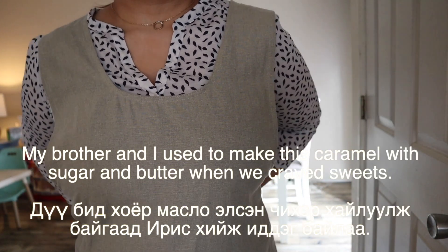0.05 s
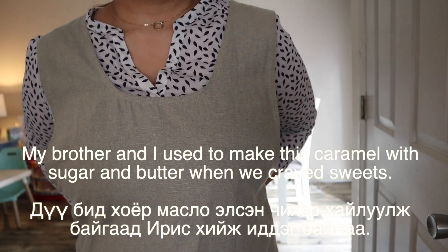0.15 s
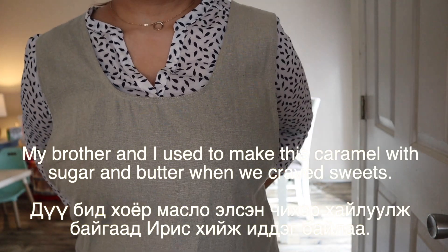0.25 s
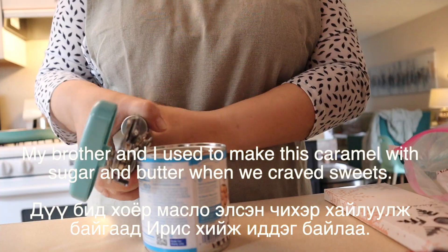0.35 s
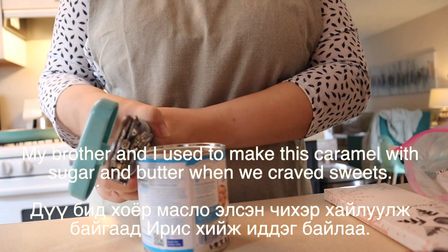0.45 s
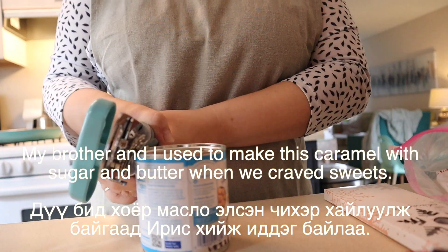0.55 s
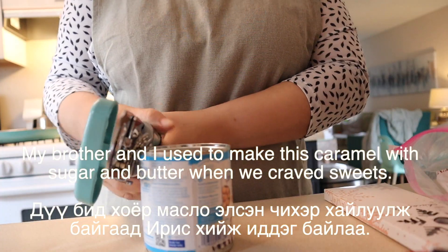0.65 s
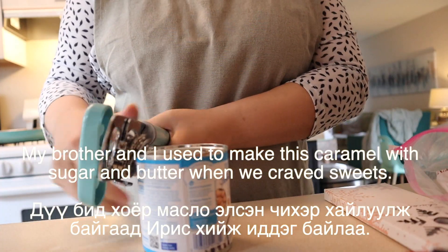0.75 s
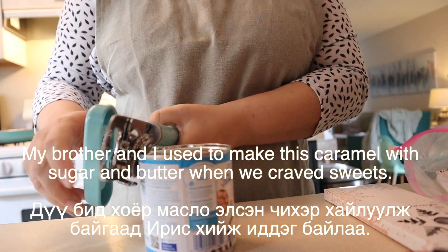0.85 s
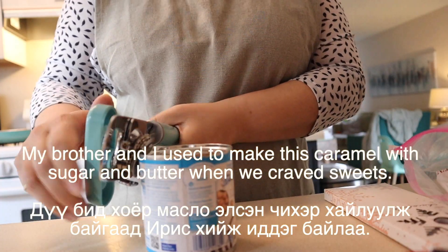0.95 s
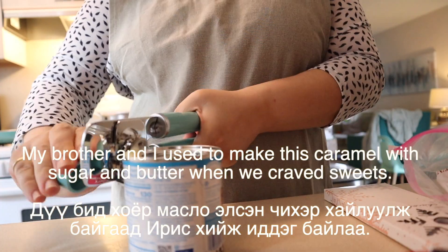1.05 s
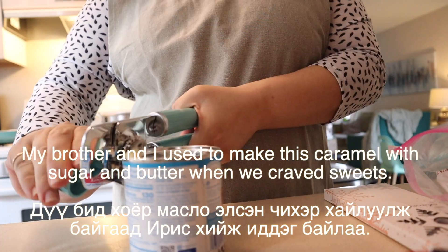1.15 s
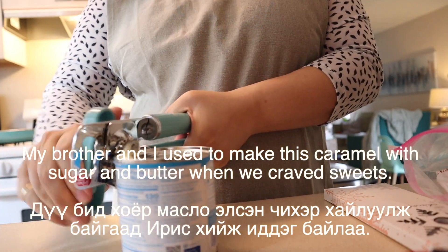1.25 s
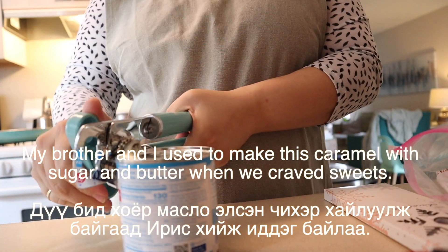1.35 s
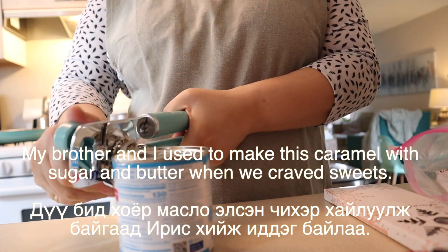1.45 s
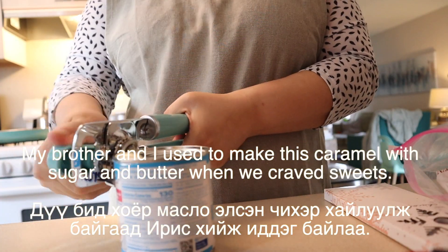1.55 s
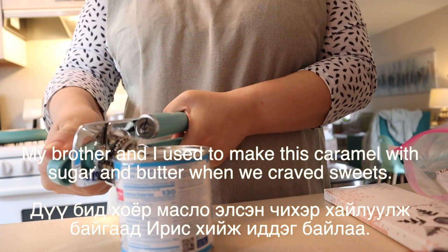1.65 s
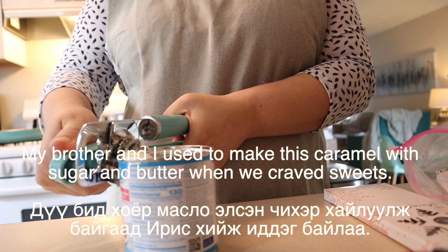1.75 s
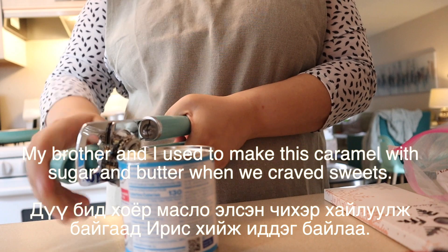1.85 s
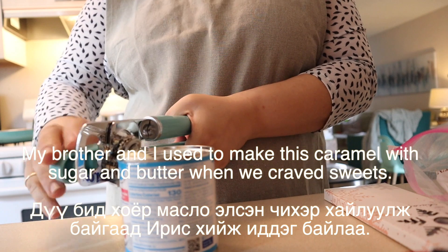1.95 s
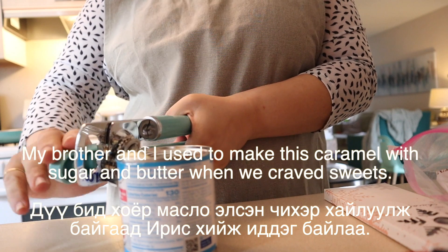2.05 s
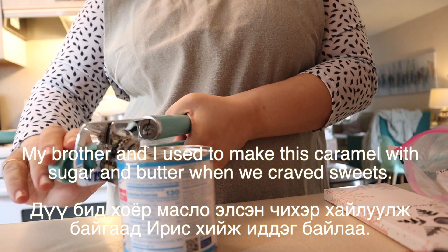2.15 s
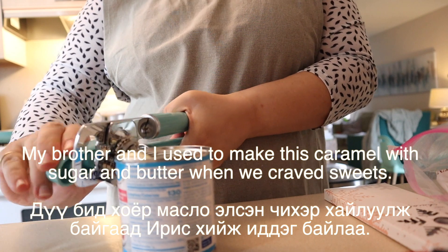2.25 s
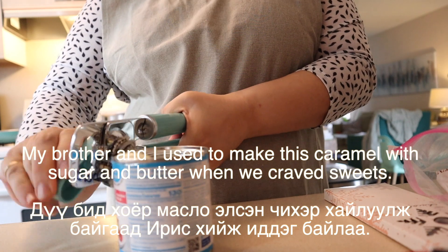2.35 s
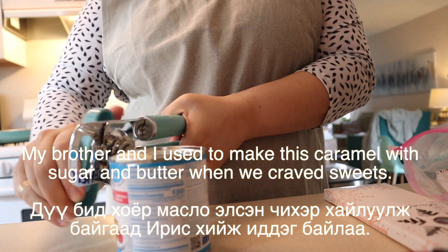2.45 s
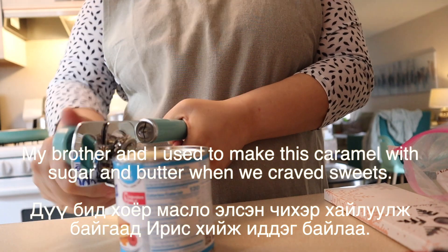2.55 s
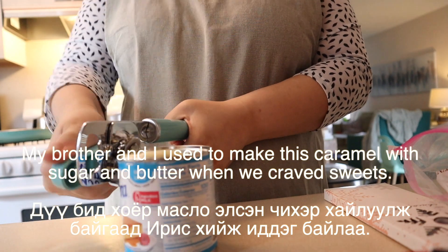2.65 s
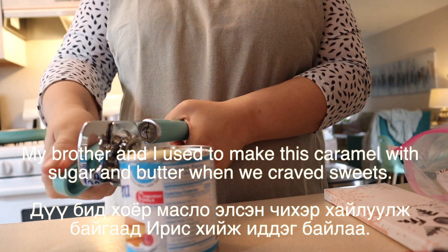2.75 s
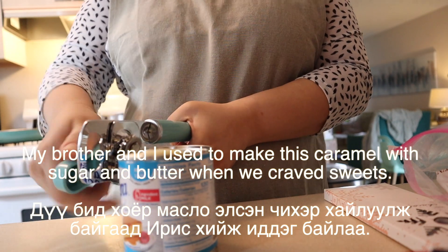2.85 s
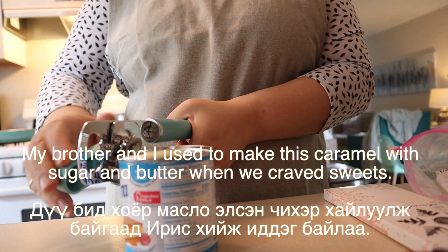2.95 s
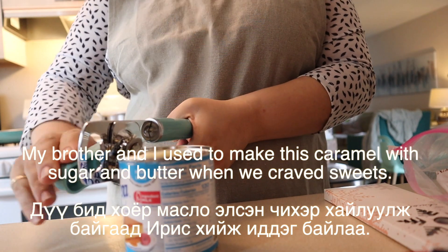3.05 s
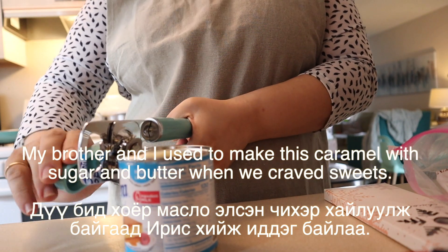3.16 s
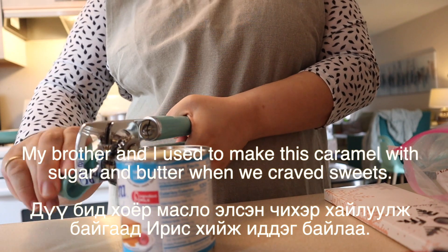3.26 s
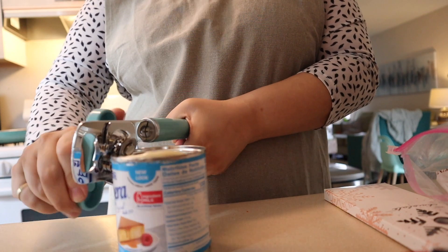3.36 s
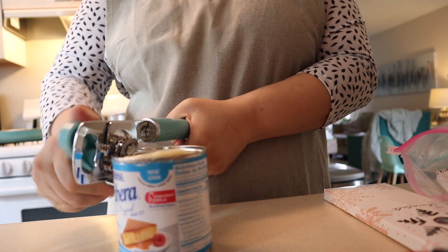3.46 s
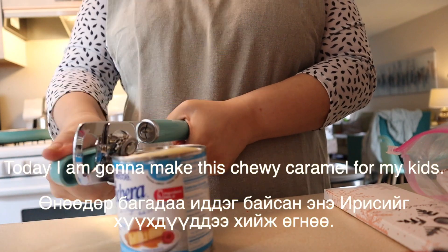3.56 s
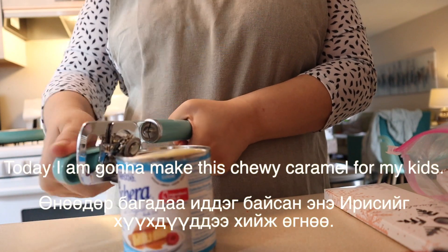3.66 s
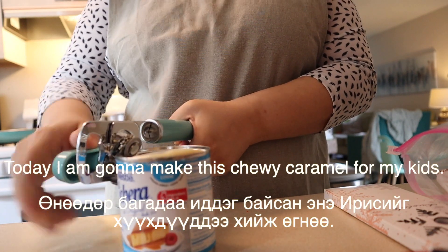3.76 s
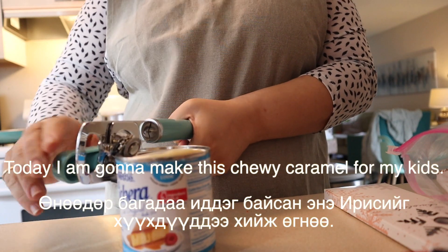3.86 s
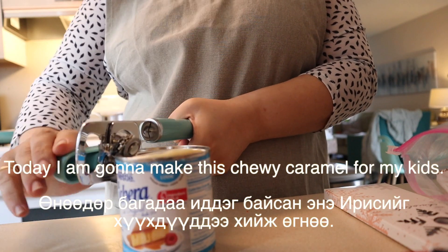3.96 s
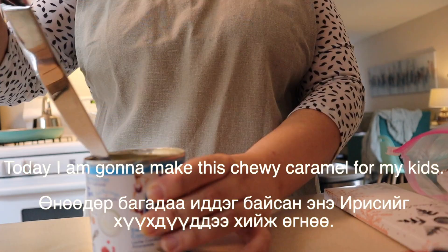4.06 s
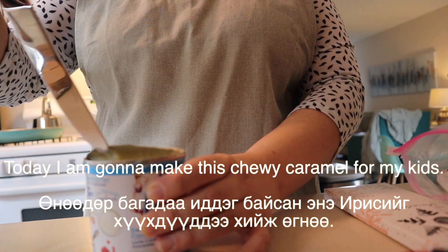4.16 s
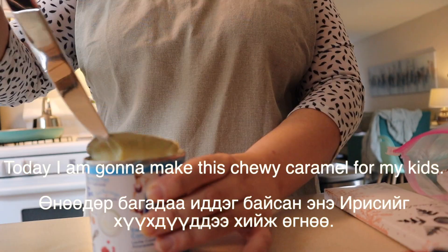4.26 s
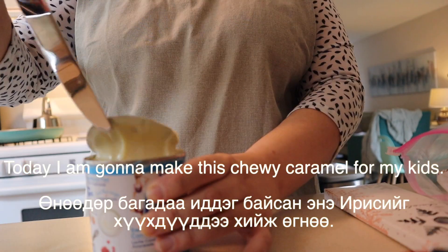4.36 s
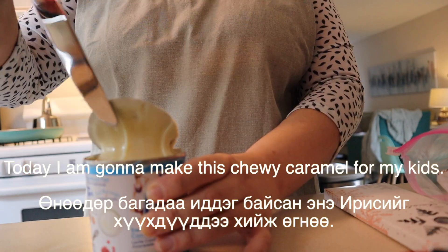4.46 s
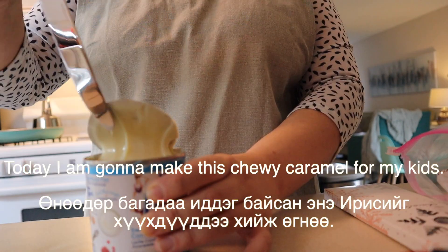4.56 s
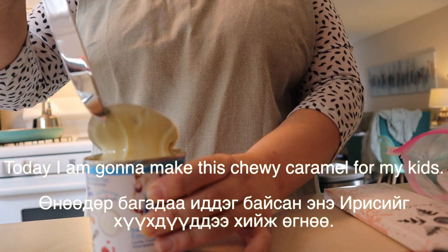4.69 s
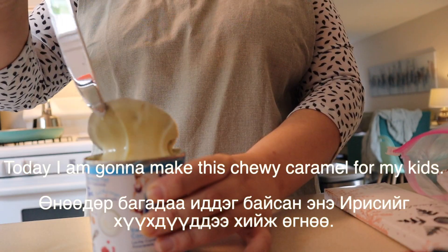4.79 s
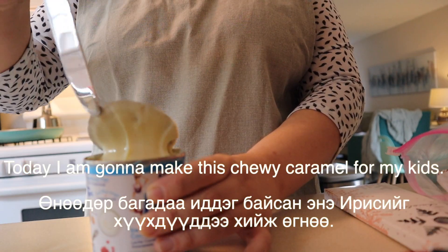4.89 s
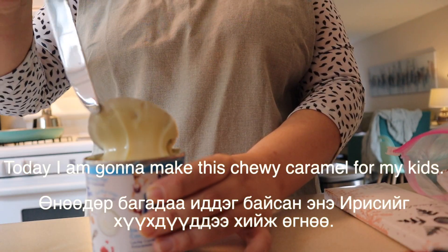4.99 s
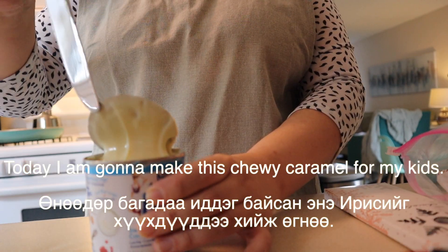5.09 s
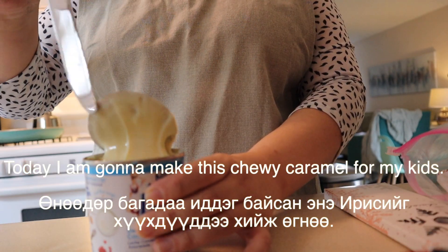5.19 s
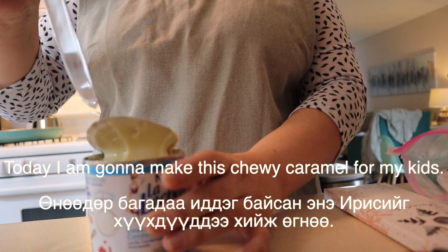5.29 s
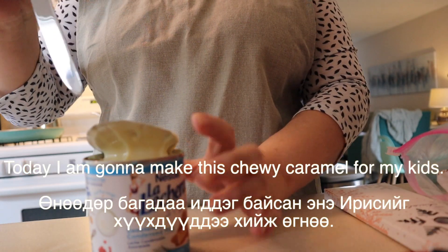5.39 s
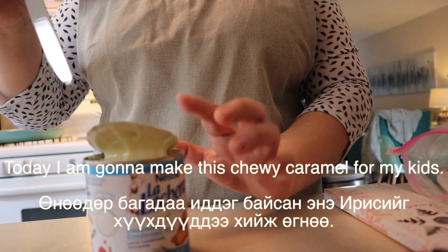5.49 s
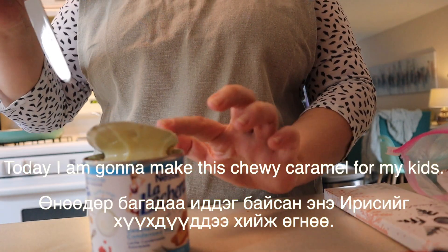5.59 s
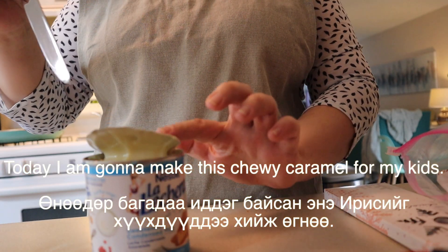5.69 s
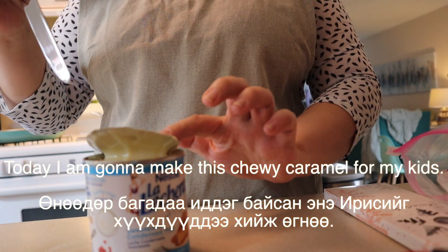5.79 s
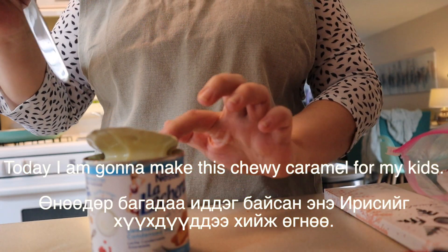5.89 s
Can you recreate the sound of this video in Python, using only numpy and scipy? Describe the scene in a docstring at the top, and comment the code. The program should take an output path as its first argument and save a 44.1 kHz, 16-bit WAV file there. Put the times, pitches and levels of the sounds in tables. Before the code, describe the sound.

Close metallic knocks, a puncturing crack and three grating can-opener turns over a faint fridge hum, ending with a knife ring and lid pop.

```python
"""Over a fridge hum and quiet room noise, hands rustle and a can opener knocks a tin on a wooden table.
It punctures the lid, then tears round the rim in three rasping turns, with snaps, clicks and more knocks.
A knife taps the rim, grates under the lid, skids off and rings; the lid flexes with a pop and grazes the blade.
Blows are decaying modes and filtered noise bursts; friction is random slips ringing metal; the treble is wide."""
import sys
import numpy as np
from scipy import signal
from scipy.fft import rfft, irfft, next_fast_len
from scipy.io import wavfile
from scipy.ndimage import uniform_filter1d, map_coordinates

SR = 44100
rng = np.random.default_rng(int(sys.argv[2]) if len(sys.argv) > 2 else 0)


def generate_wav(signal):
    """Clip the signal to [-1, 1] and save it as 16-bit WAV at the path in sys.argv[1]."""
    frames = np.transpose(np.atleast_2d(signal))
    scaled = np.clip(frames, -1, 1) * 32767
    pcm = np.round(scaled).astype(np.int16)
    wavfile.write(sys.argv[1], SR, pcm)


N = 261513
TIME = np.arange(N) / SR  # seconds

# Force strokes of the crank. The first turn stalls partway and takes two twists; the second starts firmly
# and swells again without stopping, in two overlapping rows; the third is one row. Each row: start in seconds,
# build-up in seconds, easing in seconds, rasp gain in dB, hiss gain above it in dB, table rumble gain in dB.
CRANK_STROKES = [(1.255, 0.034, 0.13, -31.5, -6, -38), (1.469, 0.044, 0.2, -36, -7, -30.5),
                 (2.36, 0.061, 0.068, -35, -4, -36), (2.501, 0.023, 0.23, -31, -4, -27.5),
                 (3.354, 0.19, 0.039, -31, -3, -28.5)]
# A drive-wheel tooth catches on the rim and the blade lurches on. Each row: start in seconds,
# extra force in dB before the swell, which lets about 0.6 of it through.
TOOTH_CATCHES = [(1.315, -1), (1.470, 2), (1.494, 4), (1.600, 3.5), (1.655, 4), (2.330, 6), (2.405, 1.5),
                 (2.450, 5.5), (2.503, 1.5), (2.682, 2), (3.322, 5.5), (3.352, 4), (3.378, 0), (3.449, 2.5),
                 (3.476, 0), (3.526, 7.5), (3.561, 8)]
# Resonance of the tearing lid. Each row: frequency in Hz, level in dB.
RASP_SPECTRUM = [(120, -35), (200, -10), (290, -1.5), (345, -16), (431, -0.5), (510, -7), (620, -2),
                 (786, 10), (930, -1), (1140, -4), (1700, -8.5), (2020, -13.5), (2450, -14), (3570, -20.5),
                 (5000, -42), (11000, -100)]
# Bright resonance of the tearing edge. Each row: frequency in Hz, level in dB.
HISS_SPECTRUM = [(2000, -13), (3000, -2.5), (3590, -2), (4000, 2), (4510, -3.5), (5500, 2.5), (6600, -7.5),
                 (7500, -5), (8700, -14.5), (11200, -4.5), (13000, -29.5), (16000, -71)]
# Ring of the cutting wheel and its axle. Each row: frequency in Hz, level in dB, t60 in seconds.
WHEEL_MODES = [(3576, -2.5, 0.028), (4430, -2.5, 0.022), (4850, -10, 0.057), (5260, -13, 0.05),
               (7070, -4.5, 0.0147)]
# Ring of the tin. Each row: frequency in Hz, level in dB, t60 in seconds.
TIN_MODES = [(438.3, -0.5, 0.15), (494.7, 0, 0.083), (614, -6, 0.061), (700, -0.5, 0.046),
             (787, 7.5, 0.069), (930, -5, 0.034), (1071, 0, 0.12), (1157, 0.5, 0.1), (1238.6, -4, 0.11),
             (1418, -6.5, 0.061), (1507, -6.5, 0.07), (1676, -6, 0.12), (2036, -2.5, 0.062),
             (2362, -27, 0.051)]
# The lid's steel gives way ahead of the wheel. Each row: start in seconds, approximate crack peak in dB.
STEEL_SNAPS = [(1.314, -30), (1.548, -27.5), (1.696, -30.5), (1.705, -24.5), (2.503, -23), (2.531, -28.5),
               (2.598, -26), (2.612, -25.5), (2.756, -31), (3.3493, -21), (3.37, -34), (3.475, -25),
               (3.534, -32), (3.547, -34), (3.559, -24)]
# Pop of the dented lid. Each row: frequency in Hz, level in dB, t60 in seconds.
PUNCTURE_MODES = [(126, -5, 0.16), (435, -8, 0.19), (542, -8, 0.15), (627, -0.5, 0.12), (792, 3, 0.086),
                  (952, 1.5, 0.02), (1035, -0.5, 0.046), (1490, 0.5, 0.017), (1670, -3.5, 0.055)]
# Noise ring of steel cracking through. Each row: frequency in Hz, level in dB.
CRACK_SPECTRUM = [(300, -5.5), (800, 5), (1800, 6), (3000, -1.5), (4200, -0.5), (6500, -7), (10000, -4),
                  (13000, -16.5), (16000, -17)]
# Opener and tin knock on the table. Each row: start in seconds, overall gain in dB,
# table thump against it in dB before a 6.5 dB trim, steel tick against it in dB.
TABLE_KNOCKS = [(.324, -22.5, -8.5, -36), (.372, -27, -6, -36), (.396, -19.5, -22.5, -43),
                (.455, -25.5, -9, -42.5), (.610, -15.5, -8.5, -28.5), (.759, -14.5, -10, -22.5),
                (.762, -2, -7, -23), (1.2014, -2.5, 0, -27), (1.2861, -16, -6.5, -31), (1.314, -11, 1, -24),
                (1.463, -26, -8, -34), (1.472, -20, -4, -34), (1.698, -21.5, 4, -20),
                (1.8445, -8.5, -1.5, -28), (1.8505, -17.5, 0, -6.5), (2.17, -26.5, 7.5, -22),
                (2.599, -16.5, -2.5, -25), (2.730, -17.5, -10, -24.5), (2.998, -5.5, -2, -24),
                (3.3511, -19, 2, -22), (3.3701, -14, -3.5, -24), (3.4754, -16.5, 4.5, -31),
                (3.545, -19, 2, -25), (3.675, -25.5, -2, -52.5), (3.682, -5.5, -4.5, -24)]
# Noise ring of a knock. Each row: frequency in Hz, level in dB.
KNOCK_SPECTRUM = [(100, 0.5), (200, -9.5), (330, -4), (450, -0.5), (700, -2.5), (1150, -2), (2150, -12.5),
                  (2850, -22.5), (4500, -32), (7000, -42.5), (12000, -79.5), (16000, -71.5)]
# Ring of the wooden table top. Each row: frequency in Hz, level in dB, t60 in seconds.
TABLE_MODES = [(65.8, -21.5, 0.18), (91.8, -1.5, 0.17), (120.7, -1.5, 0.17)]
# Small sharp clicks of steel on steel. Each row: start in seconds, approximate peak in dB.
STEEL_CLICKS = [(.323, -36.5), (.892, -41), (2.02, -34.5), (2.828, -42), (2.88, -24.5), (4.116, -44),
                (4.400, -33.5), (4.435, -30), (4.954, -34.5), (5.139, -41)]
# Noise ring of a click. Each row: frequency in Hz, level in dB.
CLICK_SPECTRUM = [(300, 2.5), (800, 7), (2000, 0.5), (4000, -4), (7000, -10), (12000, -10.5),
                  (13500, -34.5), (16000, -40.5)]
# The wheel scrapes as it sinks into the lid. Each row: start in seconds, length in seconds,
# level in dB before the edges are faded, brightness in dB per octave.
WHEEL_SCRAPES = [(0.554, 0.062, -38.5, 0.5), (.604, .06, -33, -2.5)]
# Colour of those scrapes. Each row: frequency in Hz, level in dB.
SCRAPE_SPECTRUM = [(200, -7), (450, -5.5), (900, 1.5), (2000, -2), (3000, -13.5), (6000, -12.5),
                   (11000, -15.5), (13500, -33)]
# Knife tip on the rim. Each row: frequency in Hz, level in dB.
TAP_SPECTRUM = [(600, -9), (1800, 4), (2900, 5.5), (3900, 6.5), (5000, -7), (9000, -22), (12000, -16),
                (15000, -43)]
# The knife grates under the cut edge of the lid. Each row: start in seconds, length in seconds,
# level in dB before the edges are faded, brightness in dB per octave.
KNIFE_SCRAPES = [(4.306, 0.049, -42, -2.5), (4.380, 0.044, -41, -1.5), (4.428, 0.041, -36, 0.5),
                 (4.464, .05, -33.5, -1.5), (5.26, 0.039, -47, 2)]
# Colour of the pried lid. Each row: frequency in Hz, level in dB.
PRIED_SPECTRUM = [(200, 6.5), (460, 2.5), (620, -6), (880, 7.5), (1080, -5.5), (1350, 3), (1520, -7),
                  (1700, 6.5), (2020, 0.5), (2700, -13.5), (3900, -14), (5000, -17.5), (11000, -20),
                  (13500, -35)]
# Ring of the knife. Each row: frequency in Hz, level in dB, t60 in seconds.
KNIFE_MODES = [(2865, 7.5, 0.051), (3000, -6, 0.07), (3656, -10, .08), (4095, 1.5, 0.092),
               (4910, -11, 0.081), (5650, 5, 0.036), (6840, 0, 0.18), (8160, -0.5, 0.08), (8900, -7.5, .15),
               (9851, -9, 0.18), (10700, -5, 0.13), (11700, 2.5, 0.11)]
# Pop of the flexing lid. Each row: frequency in Hz, level in dB, t60 in seconds.
LID_MODES = [(815.7, 4.5, 0.058), (882, -3, 0.052), (1095, -4.5, 0.045), (1530, -13, 0.082),
             (1730, -0.5, 0.031), (1954, -6, 0.033), (2370, -12, 0.06)]
# Lid edge against the blade. Each row: frequency in Hz, level in dB.
GRAZE_SPECTRUM = [(800, -2), (2500, -4), (5000, -0.5), (7500, -7), (9200, 2.5), (11500, 1), (12800, -31),
                  (15000, -45.5)]
# Hands, sleeve and apron brush past. Each row: start in seconds, length in seconds,
# level in dB before the edges are faded, brightness in dB per octave.
CLOTH_RUSTLES = [(0, 0.44, -51.5, 0), (.37, 0.44, -44.5, -3), (1.07, 0.11, -61.5, 1.5),
                 (1.76, 0.106, -45, -4), (1.87, 0.106, -63, 4.5), (3.69, 0.15, -54, -1.5)]
# Colour of the cloth. Each row: frequency in Hz, level in dB.
CLOTH_SPECTRUM = [(150, -5.5), (450, 10.5), (1000, 4.5), (2500, -2.5), (6000, -12.5), (11500, -11.5),
                  (13500, -36.5)]
# Reflections from cupboards and far walls. Each row: delay in seconds, level in dB.
ROOM_ECHOES = [(.019, -15.5), (.039, -20), (.0565, -34.5)]
# Colour of a reflection. Each row: frequency in Hz, level in dB.
ECHO_SPECTRUM = [(100, -21), (450, 1), (1200, -1.5), (2500, -5), (6000, -17), (14000, -22)]
# Background fades. Each row: time in seconds, room noise level in dB, hum gain in dB.
BACKGROUND_LEVELS = [(0, -40, -24), (.3, -47.5, -6), (0.422, -41.5, 0.5), (3.7, -39, 2), (5.93, -40.5, 1)]
# Colour of the room noise. Each row: frequency in Hz, level in dB.
KITCHEN_SPECTRUM = [(20, -43.5), (33, -8), (48, -4.5), (65, 1), (85, -18.5), (120, -2), (155, -17.5),
                    (210, -10), (330, -16), (650, -26), (1500, -34), (4000, -45), (11000, -61.5),
                    (14700, -64.5)]
# Fridge hum lines. Each row: frequency in Hz, level in dB before the hum gain.
FRIDGE_HUM = [(59.8, -49), (120.2, -41), (195, -53)]
# Stereo width. Each row: frequency in Hz, gain of the side channel in dB.
SIDE_GAIN = [(60, -72), (120, -27.5), (250, -10), (500, -6), (1000, 0), (2000, 1.5), (4000, 4), (9000, 8),
             (14000, 13)]

GRIP_DB, LET_GO_DB = -3.5, -4.5  # force at the start and end of a stroke, against its peak
GRIP_DB_PER_S, LET_GO_DB_PER_S = 175, 279.5  # how fast the wheel takes hold and stops
HISS_GROWTH, RUMBLE_GROWTH = 1.83, 0.77  # dB of hiss and of rumble per dB of force
CLAMPED_S = (1.04, 3.6)  # the opener grips the rim
IDLE_RASP_DB, IDLE_RUMBLE_DB = -55.5, -41.5  # gains while the hands work it between strokes
TOOTH_DB, CRUNCH_DB = 1.2, 2.2  # unevenness of the bite; coarse crunches against the fine tearing
RASP_GLIDE, HISS_GLIDE = .11, .05  # depth of the pitch wander, as a share
WHEEL_DB, TIN_RASP_DB = -10, -6.5  # steady ring of wheel and tin under the sliding friction
CATCH_RISE_S, CATCH_EASE_S = 0.0059, 0.014  # a catch comes on fast and dies back into the rasp
SNAP_T60_S, SNAP_RING_DB = 0.02, -11
KNOCK_TILT_DB = 1.5  # brightness of a knock with gain and thump both at 0 dB, dB per octave
TILT_PER_PEAK_DB, TILT_PER_THUMP_DB = 0.1562, 0.3731  # added dB per octave, per dB of gain and of thump
REBOUND_S, REBOUND_DB = 0.0034934, -4  # the loose opener strikes again just after each knock
CHATTER_PER_S, CHATTER_T60_S, CHATTER_DB = 220, .24, -20  # loose handles chatter on after a knock
CLICK_TILT_DB = -1  # brightness of a click, dB per octave
HANDLING_S = (.3, 5.2)  # span of the chance ticks
FAINT_TICK_DB, FAINT_SPREAD_DB = -46, 12  # loudest chance tick, and the range below it
TIN_DETUNE, TIN_SPREAD_DB = .012, 4.5  # grip and point of contact change from blow to blow
TOP_HZ = 15000


def cutting():
    """The wheel tears along the lid in dense slips and coarser crunches; the uneven pull shakes the table."""
    clamped = 1. * ((TIME > CLAMPED_S[0]) & (TIME < CLAMPED_S[1]))
    clamped = uniform_filter1d(clamped, size=2048)
    rasp_gain = clamped * amp(IDLE_RASP_DB)
    hiss_gain = np.zeros(N)
    rumble_gain = clamped * amp(IDLE_RUMBLE_DB)
    lurch_db = lurches()
    for start, build_s, ease_s, db, hiss_db, rumble_db in CRANK_STROKES:
        force_db = effort(start, build_s, ease_s) + lurch_db
        rasp_gain = np.hypot(rasp_gain, amp(db + force_db))
        hiss_gain = np.hypot(hiss_gain, amp(db + hiss_db + HISS_GROWTH * force_db))
        rumble_gain = np.hypot(rumble_gain, amp(rumble_db + RUMBLE_GROWTH * force_db))

    tearing = unit(slips(rate=3000, spread_db=1.5) * amp(3.5 * walk(rate=140)))
    crunches = amp(CRUNCH_DB) * unit(slips(rate=165, spread_db=.5))
    coarse = tearing + crunches
    fine = tearing + amp(-4.5) * crunches
    # the wheel bites harder and softer from tooth to tooth
    biting = amp(TOOTH_DB * walk(rate=70))

    sliding_rasp = amp(-3.5) * travel(coarse, RASP_SPECTRUM, t60=0.024, glide=RASP_GLIDE)
    tin_ring = amp(TIN_RASP_DB) * driven(coarse, TIN_MODES)
    rasp = rasp_gain * biting * (sliding_rasp + tin_ring)

    sliding_hiss = amp(-7.5) * travel(fine, HISS_SPECTRUM, t60=0.018, glide=HISS_GLIDE)
    wheel_ring = amp(WHEEL_DB) * driven(fine, WHEEL_MODES)
    hiss = hiss_gain * np.sqrt(biting) * (sliding_hiss + wheel_ring)

    shake = colour(tearing, [(30, -50.5), (60, -1.0), (80, -2.0), (100, 1.0),
                             (125, -5.5), (160, -13.5), (300, -27.5), (900, -80.0)])
    return rasp + hiss + amp(0.5) * rumble_gain * unit(shake)


def effort(start, build_s, ease_s):
    """Force of one stroke in dB: the wheel grips, the wrist builds to a peak, eases off and lets go."""
    peak = start + build_s
    end = peak + ease_s
    held = np.interp(TIME, [start, peak, end], [GRIP_DB, 0, LET_GO_DB])
    before = GRIP_DB_PER_S * np.maximum(start - TIME, 0)
    after = LET_GO_DB_PER_S * np.maximum(TIME - end, 0)
    return held - before - after


def lurches():
    """Extra force in dB each time a tooth catches and breaks free."""
    out = np.zeros((1, N))
    easing = np.exp(-(TIME[None, :8192] / CATCH_EASE_S) ** 2)
    for s, db in TOOTH_CATCHES:
        add(out, s, db * swell(easing, CATCH_RISE_S))
    return out[0]


def travel(x, spectrum, t60, glide, count=5):
    """Slips ring a crowd of short steel modes, whose pitch and mix wander as the wheel moves along the rim."""
    shares = amp(7 * np.array([walk(rate=26) for _ in range(count)]))
    shares /= np.sqrt(np.sum(shares ** 2, axis=0))
    out = 0
    for share in shares:
        rung = signal.fftconvolve(x, burst(spectrum, t60, size=4096), axes=1)[:, :N]
        # reading at a wandering speed slides the pitch
        place = np.cumsum(np.exp(glide * walk(rate=18)))
        slid = np.array([map_coordinates(channel, [place], mode="mirror") for channel in rung])
        out = out + share * slid
    return unit(out)


def driven(x, modes):
    """Slips keep the fixed modes of an object ringing."""
    return unit(signal.fftconvolve(x, ring(modes, detune=0), axes=1)[:, :N])


def snaps():
    """Each sudden tear is a short crack that sets the cutting wheel ringing."""
    out = np.zeros((2, N))
    for s, db in STEEL_SNAPS:
        add(out, s, amp(db) * burst(CLICK_SPECTRUM, t60=SNAP_T60_S, tilt_db=-1.5))
        wheel = ring(struck(WHEEL_MODES, spread_db=4.5), detune=.005)
        add(out, s, amp(db + SNAP_RING_DB) * wheel)
    return out


def puncture():
    """The wheel dents the lid with a pop; at once the steel cracks through and the opener rattles on the tin."""
    out = np.zeros((2, N))
    add(out, .5385, amp(-3.0) * ring(PUNCTURE_MODES, detune=0.0017))
    add(out, .5385, amp(-5.0) * burst(CRACK_SPECTRUM, t60=0.023, tilt_db=-3.0))
    add(out, .5468, amp(-4.0) * swell(burst(CRACK_SPECTRUM, t60=0.039, tilt_db=-1.0), rise_s=0.0005))
    add(out, .5495, amp(-9.5) * burst(KNOCK_SPECTRUM, t60=0.06, tilt_db=-3.5))
    return out


def knocks():
    """Blows tick, ring the tin, rattle and thump, then rebound and chatter; soft ones are duller."""
    out = np.zeros((2, N))
    for s, db, thump_db, tick_db in TABLE_KNOCKS:
        tilt_db = KNOCK_TILT_DB + TILT_PER_PEAK_DB * db + TILT_PER_THUMP_DB * thump_db
        tick = amp(tick_db) * burst(CLICK_SPECTRUM, t60=0.02, tilt_db=-1.5)
        rattle = amp(0.5) * swell(burst(KNOCK_SPECTRUM, t60=0.041, tilt_db=tilt_db), rise_s=0.00034)
        tin = ring(struck(TIN_MODES, TIN_SPREAD_DB), detune=TIN_DETUNE)
        # a practically flat curve, so that only the tilt acts
        tin = amp(-12.0) * colour(tin, [(100, 0), (16000, 0.005)], tilt_db)
        table = amp(thump_db - 6.5) * swell(ring(TABLE_MODES), rise_s=0.0041)
        bounces = slips(rate=CHATTER_PER_S, spread_db=-1, size=16384) * fade(CHATTER_T60_S)
        bounce = burst(KNOCK_SPECTRUM, t60=0.023, tilt_db=tilt_db, size=2048)
        chatter = signal.fftconvolve(bounces, bounce, axes=1)
        rebound = burst(KNOCK_SPECTRUM, t60=0.036, tilt_db=tilt_db)
        add(out, s, amp(db) * (tick + rattle + tin + table))
        add(out, s, amp(db + CHATTER_DB) * chatter)
        add(out, s + REBOUND_S, amp(db + REBOUND_DB) * rebound)
    return out


def struck(modes, spread_db):
    """Each blow lands on another spot, so its modes answer in another mix."""
    return [(hz, db + spread_db * rng.standard_normal(), t60) for hz, db, t60 in modes]


def clicks():
    """Teeth, hinge and blade tick against the rim; fainter ticks come by chance while the tin is handled."""
    out = np.zeros((2, N))
    first_s, last_s = HANDLING_S
    faint = [(first_s + when * (last_s - first_s), FAINT_TICK_DB - FAINT_SPREAD_DB * soft)
             for when, soft in rng.random(size=(8, 2))]
    for s, db in STEEL_CLICKS + faint:
        add(out, s, amp(db) * burst(CLICK_SPECTRUM, t60=0.087, tilt_db=CLICK_TILT_DB))
    return out


def lid_lift():
    """The knife taps the rim, later skids off the edge and rings; the lid then flexes over and grazes the blade."""
    out = np.zeros((2, N))
    add(out, 4.286, amp(-29.5) * swell(burst(TAP_SPECTRUM, t60=0.023), rise_s=0.00094))
    add(out, 5.2835, amp(-22.5) * swell(burst(CLICK_SPECTRUM, t60=0.2, tilt_db=0.5), rise_s=0.0033))
    add(out, 5.284, amp(-14.5) * swell(ring(KNIFE_MODES, detune=0), rise_s=0.0042))
    add(out, 5.317, amp(-1.0) * swell(ring(LID_MODES, detune=0), rise_s=0.0047))
    add(out, 5.319, amp(-12.5) * swell(burst(GRAZE_SPECTRUM, t60=0.051), rise_s=0.0043))
    add(out, 5.320, amp(-8.5) * swell(burst(KNOCK_SPECTRUM, t60=0.071, tilt_db=4.5), rise_s=0.01))
    return out


def rubs(strokes, spectrum, rate, spread_db):
    """Short strokes of friction, for steel or cloth: filtered random slips with faded edges."""
    out = np.zeros((2, N))
    for s, length, db, tilt_db in strokes:
        size = int(length * SR)
        grit = unit(colour(slips(rate, spread_db, size), spectrum, tilt_db))
        add(out, s, amp(db) * grit * signal.windows.tukey(size, .4))
    return out


def room(x, wet_db, low_t60, high_t60):
    """Walls and cupboards answer with distinct reflections over a diffuse tail, its decay split at 2 kHz."""
    noise = rng.standard_normal((2, 32768))
    low = signal.sosfiltfilt(signal.butter(2, 2000, fs=SR, output="sos"), noise)
    tail = low * fade(low_t60, size=32768) + (noise - low) * fade(high_t60, size=32768)
    tail = colour(swell(tail, rise_s=0.0018), [(60, 0.5), (160, 1.0), (450, 3), (1200, -5.5),
                                               (2200, -1.5), (5000, -1.5), (12000, -6.0)])
    tail *= amp(wet_db) / np.sqrt(np.sum(fade(low_t60) ** 2))
    for delay_s, db in ROOM_ECHOES:
        scatter = rng.standard_normal((2, 2048)) * fade(t60=.006, size=2048)
        scatter /= np.sqrt(np.sum(scatter ** 2) / 2)
        add(tail, delay_s, amp(db) * colour(scatter, ECHO_SPECTRUM))
    return x + signal.fftconvolve(x, tail, axes=1)[:, :N]


def background():
    """Centred fridge hum, wavering in level and phase, over stereo room noise; both follow the fades."""
    s, air_db, hum_db = np.transpose(BACKGROUND_LEVELS)
    air = amp(np.interp(TIME, s, air_db))
    hum = amp(np.interp(TIME, s, hum_db))
    lines = 0
    for hz, db in FRIDGE_HUM:
        level = amp(db + 1.1 * walk(rate=4.8)) * np.sqrt(2)
        lines = lines + level * np.sin(2 * np.pi * hz * TIME + 0.069 * walk(rate=5.7))
    hiss = unit(colour(rng.standard_normal((2, N)), KITCHEN_SPECTRUM))
    noise = air * amp(1.2 * walk(rate=8.8)) * hiss
    return noise + hum * lines * np.array([[1], [0]])


def slips(rate, spread_db, size=N):
    """Stick-slip: random tiny releases of uneven size, (mid, side)."""
    released = rng.random(size) < rate / SR
    sizes = released * amp(spread_db * np.minimum(rng.exponential(size=size), 4))
    return sizes * rng.standard_normal((2, size))


def burst(points, t60, tilt_db=0, size=16384):
    """Many overlapping short modes as decaying coloured noise, (mid, side), with a peak near 1."""
    x = colour(rng.standard_normal((2, size)) * fade(t60, size), points, tilt_db)
    return x / np.sqrt(np.sum(x ** 2, axis=1, keepdims=True)) * np.sqrt(SR * t60 / 50)


def ring(modes, detune=0.0053, size=16384):
    """Free ring of an object; each mode reaches the side channel a quarter cycle off the mid."""
    out = 0
    for k, (hz, db, t60) in enumerate(modes):
        turn = 2 * np.pi * hz * (1 + detune * rng.standard_normal()) * TIME[:size]
        mid = (-1) ** k * np.sin(turn)
        side = np.cos(turn) * np.minimum(turn, 1)  # starts from silence
        out = out + amp(db) * fade(t60, size) * np.array([mid, side])
    return out / np.sqrt(np.sum(amp([m[1] for m in modes]) ** 2))


def fade(t60, size=16384):
    """Exponential decay by 60 dB in t60 seconds."""
    return np.exp(-np.log(1000) * TIME[:size] / t60)


def swell(x, rise_s):
    """Soften the onset so that a sound builds up while the contact lasts."""
    return x * (1 - np.exp(-(TIME[:x.shape[-1]] / rise_s) ** 2))


def walk(rate):
    """Smooth random wander with a spread near 1, heading for a new value rate times a second."""
    knots = rng.standard_normal(4096)
    return 1.2 * np.interp(TIME * rate, np.arange(len(knots)), knots)


def colour(x, points, tilt_db=0):
    """Causal minimum-phase filter through (Hz, dB) points, tilted about 1 kHz by dB per octave."""
    size = next_fast_len(x.shape[-1] + 4096, real=True) * 2
    octave = np.log2(np.maximum(np.arange(size // 2 + 1) * SR / size, 10) / 1000)
    hz, db = np.transpose(points)
    # the tilt stops growing below 250 Hz
    gain_db = np.interp(octave, np.log2(hz / 1000), db) + tilt_db * np.maximum(octave, -2)
    # folding the cepstrum makes the response causal
    cepstrum = irfft(gain_db * np.log(10) / 20)
    cepstrum[1:size // 2] *= 2
    cepstrum[size // 2 + 1:] = 0
    return irfft(rfft(x, size) * np.exp(rfft(cepstrum)))[..., :x.shape[-1]]


def amp(db):
    """Decibels to a linear gain."""
    return 10 ** (np.asarray(db) / 20)


def unit(x):
    """Scale a (mid, side) pair to rms 1."""
    return x / np.sqrt(np.mean(x ** 2))


def add(out, s, x):
    """Mix a sound in at time s in seconds."""
    start = int(s * SR)
    out[:, start:start + x.shape[-1]] += x[:, :N - start]


def scene():
    """All sources as mid and side; the side gain rises with frequency before the turn to left and right."""
    scrapes = rubs(WHEEL_SCRAPES, SCRAPE_SPECTRUM, rate=2200, spread_db=-0.46)
    prying = rubs(KNIFE_SCRAPES, PRIED_SPECTRUM, rate=3500, spread_db=0.5)
    rustles = rubs(CLOTH_RUSTLES, CLOTH_SPECTRUM, rate=5000, spread_db=-3.5)
    handling = cutting() + snaps() + puncture() + knocks() + clicks() + scrapes + prying + rustles
    near = room(handling, wet_db=-7.0, low_t60=0.3306, high_t60=0.36)
    near = near + room(lid_lift(), wet_db=-9.5, low_t60=0.268, high_t60=0.31)
    mid, side = near + background()
    hz, db = np.transpose(SIDE_GAIN)
    log_hz = np.log(np.fft.rfftfreq(N, 1 / SR) + 1)
    side = irfft(rfft(side) * amp(np.interp(log_hz, np.log(hz), db)), N)
    return np.array([mid + side, mid - side])


def record(dry):
    """The stereo microphone clips at full scale, thins the deepest bass, dulls the treble and cuts the top."""
    sound = colour(np.clip(dry, -1, 1), [(15, -15.5), (30, -25.5), (48, 0.0),
                                         (12000, -0.5), (13200, -1.0), (15000, -10.5)])
    return signal.sosfilt(signal.ellip(8, .2, 80, TOP_HZ, fs=SR, output="sos"), sound)


dry = scene()
out = record(dry)
generate_wav(out)
```